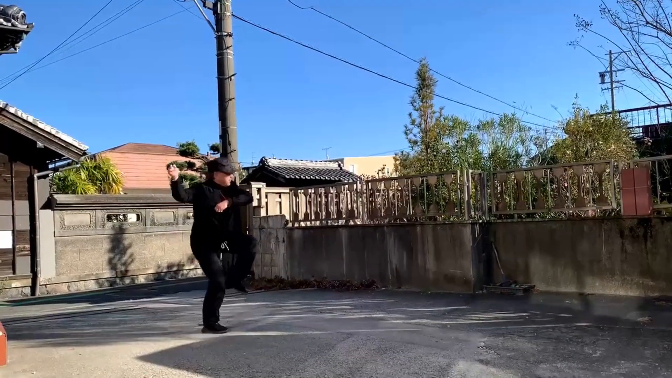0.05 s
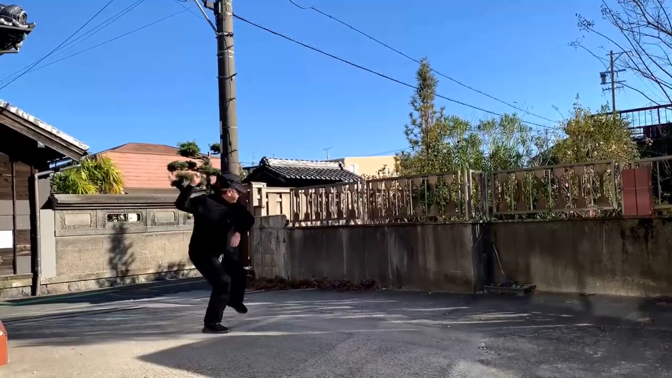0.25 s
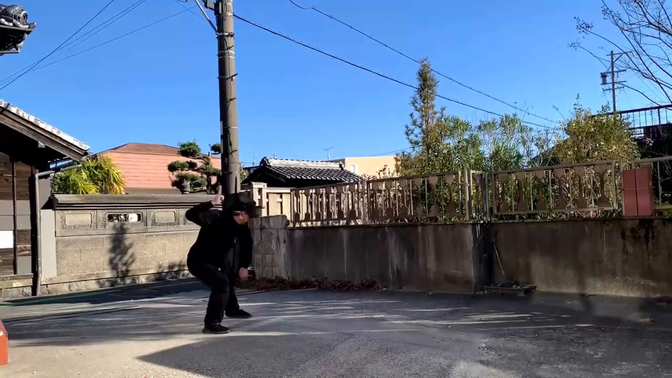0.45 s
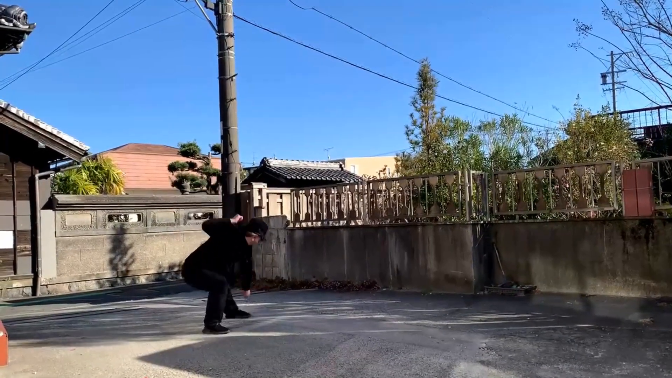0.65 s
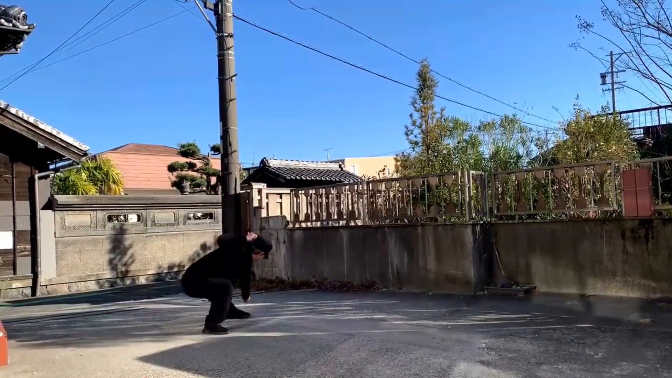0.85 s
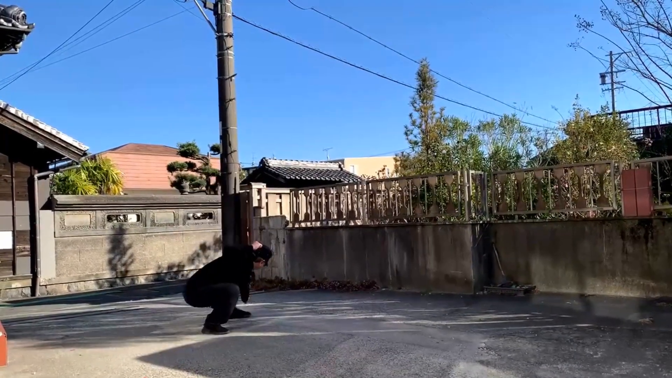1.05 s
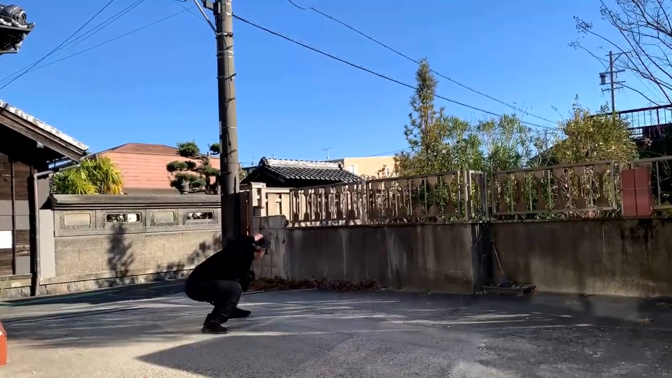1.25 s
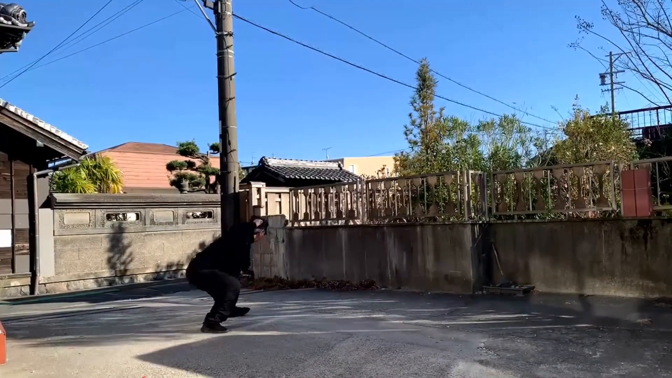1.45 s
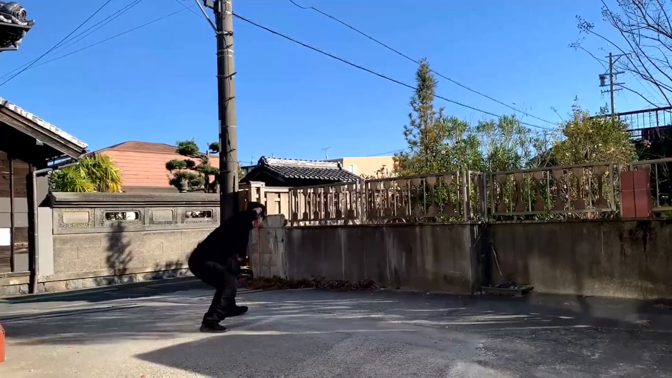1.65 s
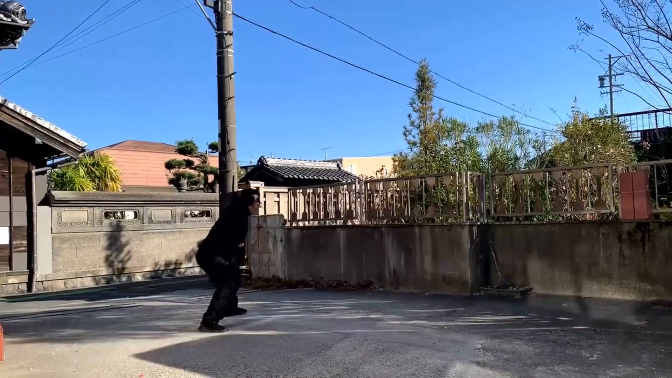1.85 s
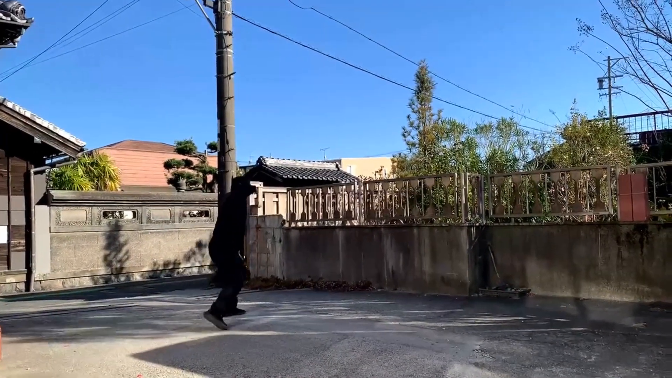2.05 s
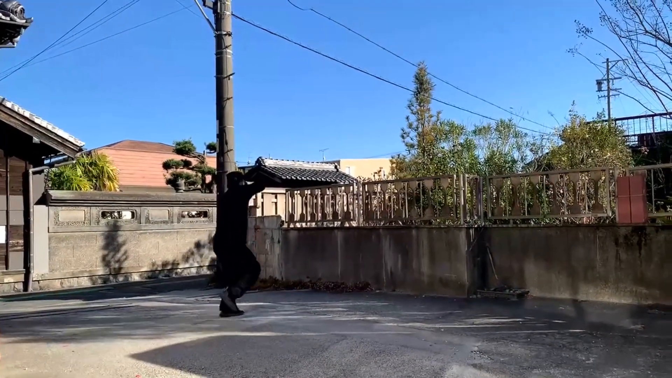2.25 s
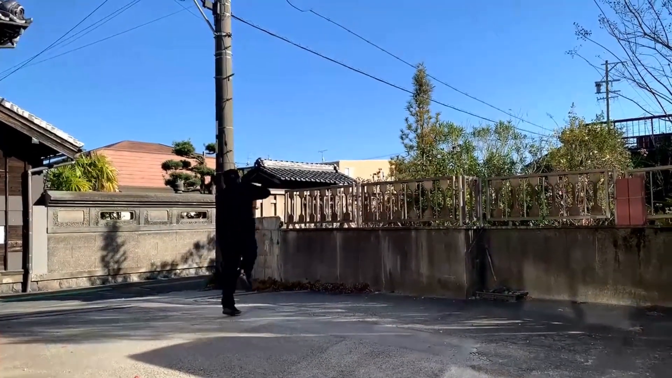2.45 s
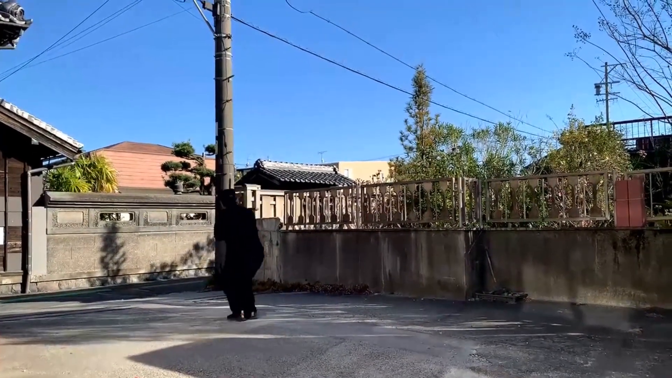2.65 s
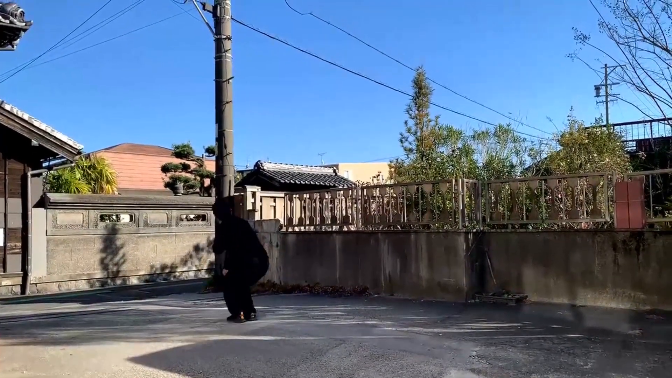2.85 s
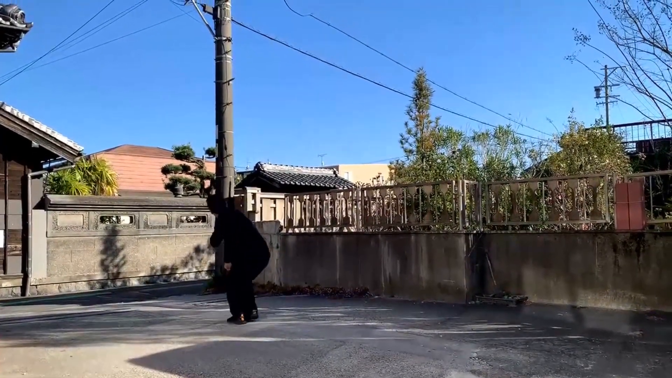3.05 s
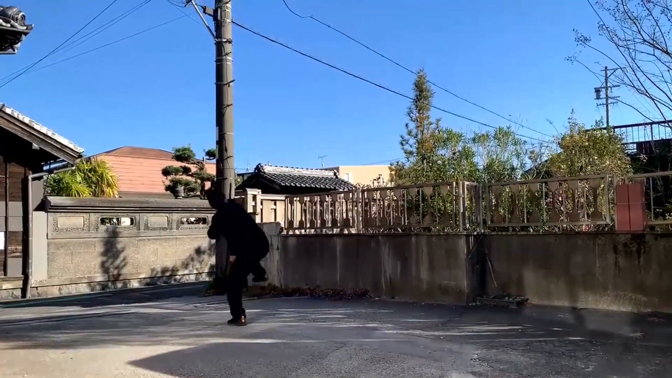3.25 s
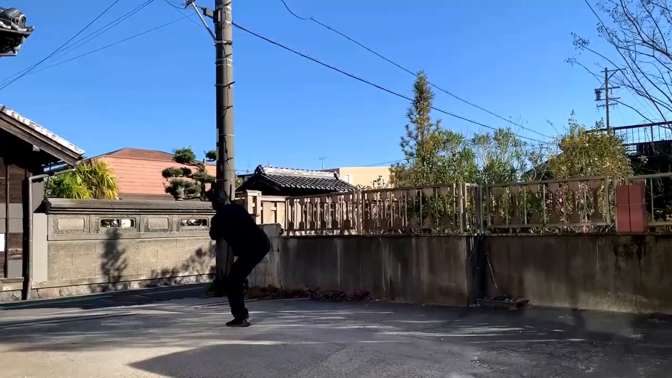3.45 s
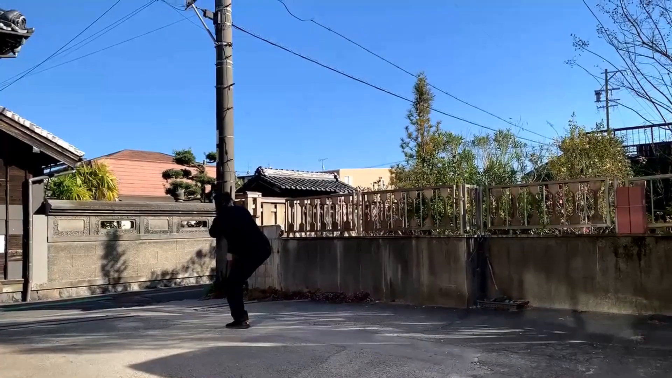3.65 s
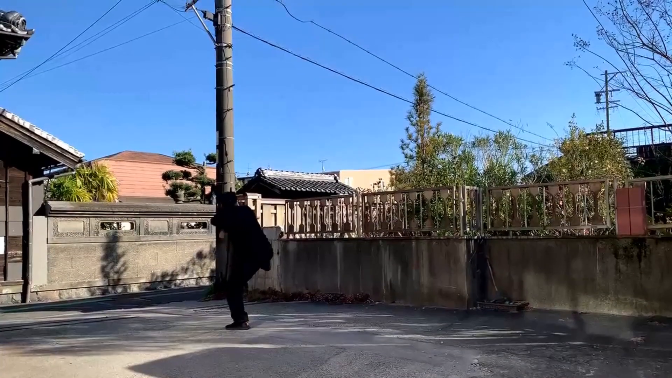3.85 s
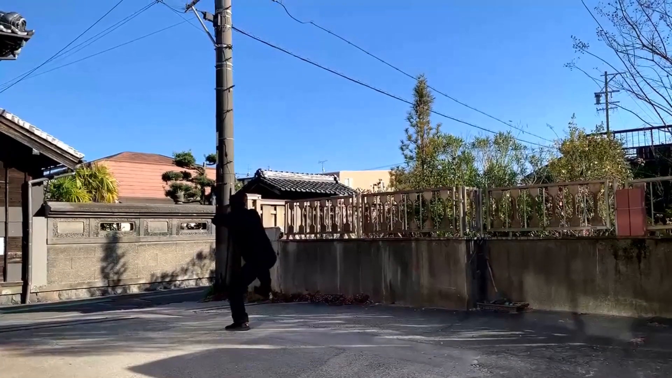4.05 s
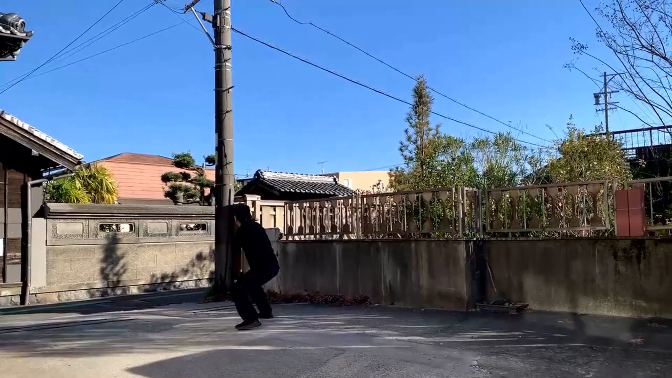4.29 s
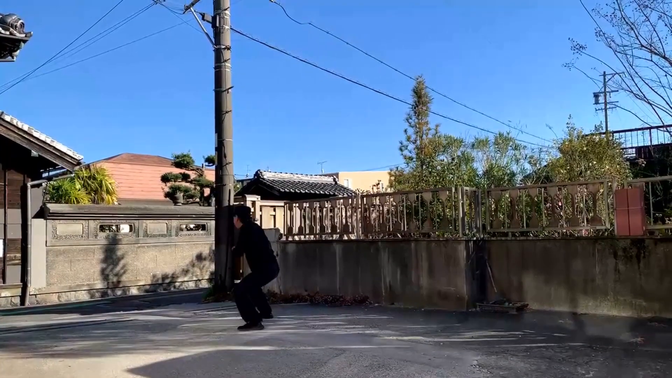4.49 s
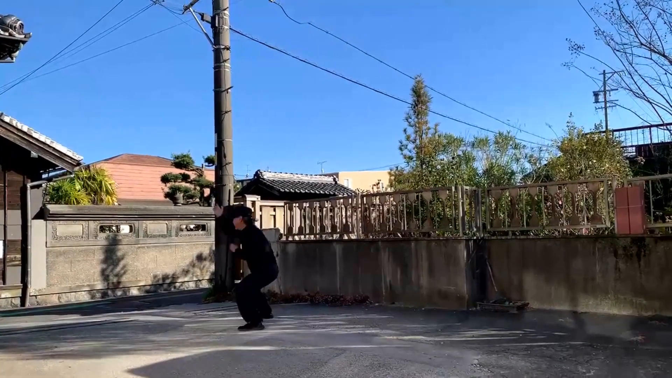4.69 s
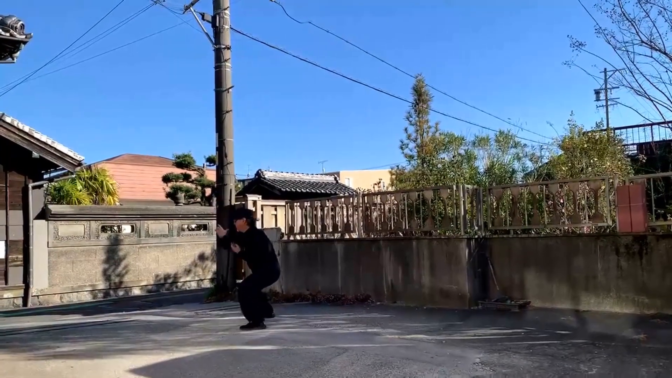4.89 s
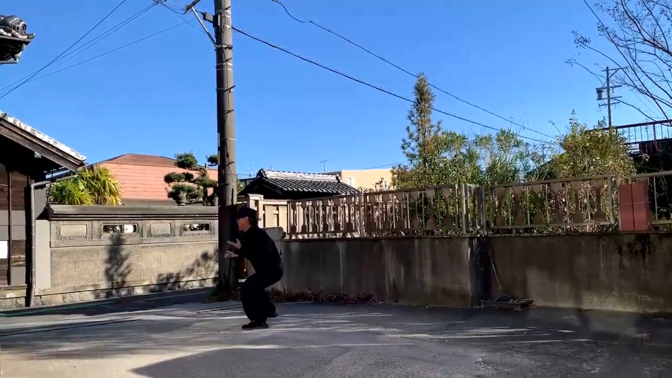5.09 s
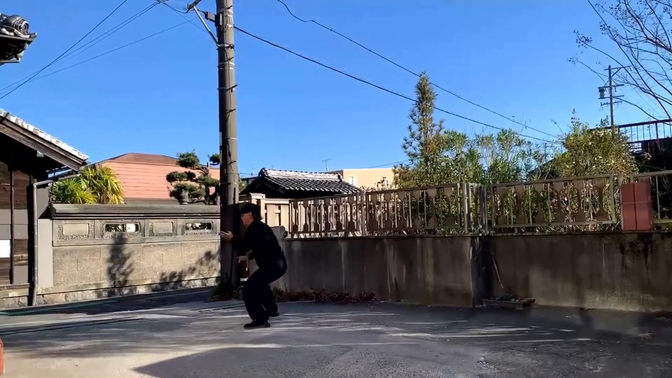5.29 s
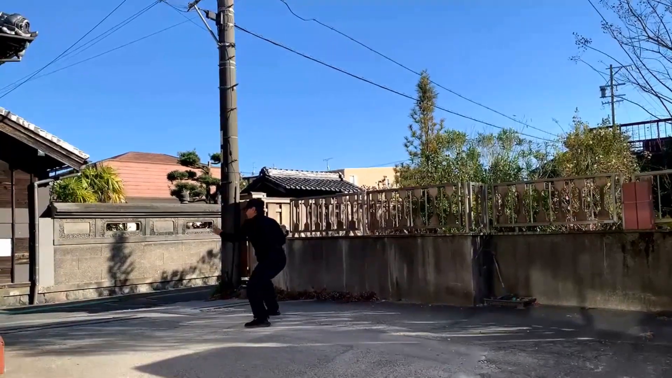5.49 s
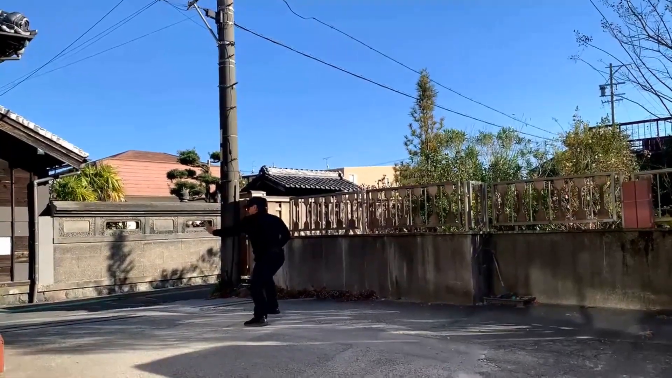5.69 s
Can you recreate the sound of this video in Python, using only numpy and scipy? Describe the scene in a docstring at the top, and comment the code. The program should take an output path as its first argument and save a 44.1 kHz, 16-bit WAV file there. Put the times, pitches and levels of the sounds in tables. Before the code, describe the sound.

Someone practises martial arts outdoors: a light step, scraping soles and ticking grit, then two sharp stamps with short echoes over faint low rumble.

```python
"""A person practises martial arts in a walled asphalt yard, some metres from a phone.
A light step opens, with gusts buffeting the microphone, and an airy hiss lingers after it.
Soles scuff, grit ticks and cloth swishes, all shaped noise; then two hard stamps ring the shoe, thump
the ground and echo off the walls, each with a low tone after it, and scuffs and wind carry on.
Throughout, far off, a town rumbles as slowly swelling noise."""
import sys
import numpy as np
from scipy import signal
from scipy.fft import rfft, irfft
from scipy.io import wavfile
from scipy.ndimage import uniform_filter1d

SR = 44100
rng = np.random.default_rng(int(sys.argv[2]) if len(sys.argv) > 2 else 0)


def digitize_waveform(pressure):
    """Quantize a signal to 16-bit integers and store it at the path in sys.argv[1].

    Rows of a 2-D input are taken as channels; values are limited to [-1, 1].
    """
    field = np.atleast_2d(pressure).T
    bounded = np.clip(field, -1, 1)
    quanta = np.round(bounded * 32767).astype(np.int16)
    wavfile.write(sys.argv[1], SR, quanta)


N = 252693
T = np.arange(N) / SR
HZ = np.maximum(np.arange(N // 2 + 1) * SR / N, 1)


def undb(db):
    """Decibels to gain."""
    return 10 ** (np.asarray(db) / 20)


def unit(x):
    """Scaled to rms 1."""
    return x / np.sqrt(np.mean(x ** 2))


def over_hz(table, axis=1):
    """A table column at every frequency bin, interpolated over log frequency."""
    rows = np.array(table)
    return np.interp(np.log(HZ), np.log(rows[:, 0]), rows[:, axis])


def over_time(table):
    """A (time, level) table at every sample."""
    return np.interp(T, *np.transpose(table))


def band(x, lo_hz, hi_hz, order=2):
    """Causal band-pass."""
    edges = [lo_hz, min(hi_hz, .45 * SR)]
    return signal.sosfilt(signal.butter(order, edges, "band", fs=SR, output="sos"), x)


def walk(rate):
    """Random levels held 1 / rate s and smoothed twice; rms 1."""
    k = int(SR / rate)
    steps = np.repeat(rng.standard_normal(N // k + 1), k)
    return unit(uniform_filter1d(uniform_filter1d(steps, k), k)[:N])


def add(out, s, sound):
    """Mixes a sound in at s seconds."""
    i = int(s * SR)
    out[..., i:i + len(sound)] += sound[:N - i]


def fade(t, t60):
    """Exponential decay, 60 dB down at t60."""
    return np.exp(-np.log(1000) * t / t60)


def rise(t, tau):
    """Exponential onset with time constant tau."""
    return 1 - np.exp(-t / tau)


# contacts of a light step and two stamps, heel then sole:
# start_s, crack_db, grit_db, thud_db, boom_db, push_ms
CONTACTS = [(.031, -33, -55, -49, -48, 0.34), (.048, -45, -50, -56, -55, .2),
            (0.054, -39.5, -62, -54, -63, 0.13), (.059, -44, -59, -56.5, -63, .2),
            (.068, -42.5, -62, -63, -53, 0.3), (.078, -45.5, -58, -61, -65, .2),
            (.087, -51, -50, -59, -60, 0.41), (.102, -57, -56, -71, -60, .3),
            (2.708, -24, -36, -21.5, -49.5, 0.22), (2.713, -38, -57, -21.5, -27.5, 0.98),
            (2.721, -38, -54, -27, -47, .4), (2.727, -29.5, -47, -20, -39.5, 0.56),
            (2.737, -32, -54, -37.5, -47, .3), (2.747, -36.5, -50, -32.5, -36.5, 0.18),
            (2.757, -40, -53, -36.5, -46, .3), (2.775, -43.5, -61, -33.5, -39.5, .9),
            (2.803, -50, -66, -42, -51.5, .5), (4.206, -23.5, -39, -24.5, -36.5, 0.2),
            (4.213, -47.5, -57, -23, -33, 0.76), (4.221, -35.5, -54, -30.5, -38, 0.69),
            (4.231, -31.5, -54, -35, -44, .3), (4.237, -39, -45, -31, -36, .9),
            (4.244, -38, -47, -40, -56, .3), (4.254, -41, -52, -47.5, -51.5, 0.76),
            (4.268, -50, -57, -47, -50.5, .3)]
# modes a shoe on asphalt rings with, before chance: pitch_hz, level_db, t60_s
SHOE_MODES = [(153.8, -10, 0.023), (195, -4, 0.039), (297.4, 1, 0.031), (361.3, 2.5, 0.041),
              (411.4, 1.5, 0.033), (504, -8, 0.071), (611, -2.5, 0.041), (793, -5, 0.033),
              (1008, -0.5, 0.018), (1220, -0.5, 0.013), (1550, -3.5, 0.011), (2058, -1, 0.0078),
              (2620, -17.5, 0.0076)]


def stamps(level_spread_db=4.26, pitch_spread=0.0083):
    """Each contact: a crack and a spray of grit, and a push that rings the shoe."""
    out, cracks, sprays, t = np.zeros(N), np.zeros(N), np.zeros(N), T[:SR // 4]
    burst = rise(t, 0.0011) * (fade(t, 0.02) + 0.16 * fade(t, 0.089))
    spray = rise(t, 0.001) * (fade(t, 0.01) + 0.15 * fade(t, 0.12))
    for s, crack_db, grit_db, thud_db, _, push_ms in CONTACTS:
        add(cracks, s, undb(crack_db) * burst)
        add(sprays, s, undb(grit_db) * spray)
        chance = rng.standard_normal((len(SHOE_MODES), 2))
        ring = 0
        for k, ((hz, db, t60), (a, b)) in enumerate(zip(SHOE_MODES, chance)):
            gain = undb(db + level_spread_db * a)
            tone = np.sin(2 * np.pi * hz * (1 + pitch_spread * b) * t)
            # neighbouring modes swing opposite ways, so the blow starts without a spike
            ring = ring + (-1) ** k * gain * tone * fade(t, t60)
        push = np.hanning(int(push_ms * SR / 1000) + 3)  # a longer push rings fewer high modes
        add(out, s, undb(thud_db) * np.convolve(ring, push / push.sum())[:len(t)])
    noise = rng.standard_normal(N) * undb(4.06 * walk(220))  # rough, lumpy contact
    crack = 2.07 * band(noise, 540, 2990) + 3.5 * band(noise, 620, 1150)
    crack += 0.74 * band(noise, 1900, 2600)
    grit = 2.9 * band(noise, 2600, 3195) + 2.0 * band(noise, 2900, 5350)
    grit += 1.5 * band(noise, 3400, 9000, order=1) + 0.55 * band(noise, 9500, 11000)
    return out + cracks * crack + sprays * grit


def booms():
    """Each contact also shakes the ground; two low decaying tones make a short boom."""
    out, t = np.zeros(N), T[:SR // 4]
    boom = 2.0 * np.sin(2 * np.pi * 95 * t) * fade(t, 0.17)
    boom += 1.9 * np.sin(2 * np.pi * 58 * t) * fade(t, 0.059)
    for s, _, _, _, boom_db, _ in CONTACTS:
        add(out, s, undb(boom_db) * boom)
    return out


# low tones that swell and fade after each stamp, perhaps a fence panel:
# start_s, pitch_hz, level_db, rise_s, t60_s
HUM_TONES = [(2.795, 283.6, -29, 0.027, 0.11), (4.284, 286, -26, 0.018, 0.13),
             (4.343, 275, -38.5, .009, 0.094)]


def hums():
    """A nearly pure tone with a faint octave, swelling and dying along bell curves."""
    out, t = np.zeros(N), T[:SR // 2]
    for s, hz, db, rise_s, t60 in HUM_TONES:
        turn = 2 * np.pi * hz * t
        swell = (1 - np.exp(-(t / rise_s) ** 2)) * fade(t ** 2 / t60, t60)
        add(out, s, undb(db) * swell * (np.sin(turn) + 0.15 * np.sin(2 * turn)))
    return out


# separate scuffs of a sole or swishes of cloth; attack and release climb or drop 20 dB, the last three
# columns are relative to level_db: start_s (of the hold), level_db, attack_s, hold_s, release_s,
# lows_db, bite_db, highs_db
SCUFF_EVENTS = [(0.026, -63.5, 0.0071, 0.039, 0.048, 13.5, 3, 11),
                (0.161, -54.5, 0.043, .004, 0.044, -13, -34, -29),
                (0.216, -81, .05, .3, 0.23, -14, -24, -28), (0.585, -71.5, 0.12, .01, 0.68, 2, -7.5, -2.5),
                (0.734, -71, 0.027, .004, 0.045, 8.5, 2.5, -3), (0.829, -66, 0.043, .004, 0.11, 2, -6, -4),
                (0.898, -56.5, 0.042, 0.0045, 0.036, 0, -2.5, -6.5),
                (0.984, -60.5, 0.048, 0.11, 0.13, 1, -8, -2),
                (1.367, -68.5, 0.099, 0.027, 0.31, 2.5, -5, -3),
                (1.566, -63, 0.072, 0.067, 0.059, 0.5, -6.5, -8),
                (1.612, -59.5, 0.033, 0.026, 0.073, -16, -2, -3.5),
                (1.792, -72.5, 0.29, .004, 0.1, -1.5, -5.5, -3),
                (2.08, -81, 0.03, 0.0036, 0.068, 18, -7, 2),
                (2.137, -67, 0.021, 0.036, 0.019, 7, -5.5, 5.5),
                (2.358, -81.5, 0.051, 0.032, 0.036, -9, -4, 0),
                (2.541, -53, 0.021, 0.0048, 0.016, -5, 4.5, -5),
                (2.65, -65.5, 0.037, 0.072, 0.1, -0.5, -11.5, -8),
                (3.174, -56, 0.034, 0.013, 0.033, -0.5, -2.5, -2),
                (3.41, -53.5, 0.03, 0.051, 0.042, 0.5, -5, -2),
                (3.858, -76.5, 0.068, 0.0038, 0.042, -8, -16.5, -29),
                (3.99, -91.5, 0.015, 0.003, 0.014, 20.5, -19.5, -18),
                (4.2, -58.5, 0.026, 0.048, 0.19, 8.5, -13, -9.5),
                (4.402, -53.5, 0.0063, 0.0035, 0.059, 0.5, -6.5, -9),
                (4.536, -74, 0.043, 0.0027, 0.055, 0, -1, -10),
                (4.606, -68, 0.025, 0.018, 0.059, -3.5, -5, -7),
                (4.989, -67, 0.041, 0.0035, 0.038, -0.5, -7, -18),
                (5.237, -65.5, 0.047, 0.0052, 0.039, -3.5, -36, -31),
                (5.309, -77, 0.039, 0.0044, 0.027, 2, 0.5, -2),
                (5.589, -61, 0.11, .004, 0.13, 0, -9.5, -5.5),
                (5.687, -63, 0.062, 0.035, .05, -14, -18, -12)]
# faint rustle of clothing between the scuffs: time_s, level_db
CLOTH_RUSTLE = [(0, -76), (.6, -95), (1.2, -90), (1.75, -90), (1.95, -86), (2.25, -84), (2.48, -100),
                (3.12, -81), (3.3, -96), (3.7, -103), (4.1, -102), (4.5, -84), (4.8, -100), (5.15, -100),
                (5.45, -84.5), (5.73, -84)]
RUSTLE_LOWS_DB, RUSTLE_BITE_DB, RUSTLE_HIGHS_DB = 2.5, -13.5, -7  # relative to the rustle level


def scuffs(grain_db=4.0, patchy_db=2.0, crunch_db=4.0):
    """Dense grit of uneven sizes; the sole rings the lows in crunchy lumps. Returns shared, left, right."""
    colours_db = np.array([[0], [RUSTLE_LOWS_DB], [RUSTLE_BITE_DB], [RUSTLE_HIGHS_DB]])
    power = undb(over_time(CLOTH_RUSTLE) + colours_db) ** 2
    for s, db, attack, hold, release, *colour_db in SCUFF_EVENTS:
        on = slice(max(int((s - 3 * attack) * SR), 0), int((s + hold + 3 * release) * SR))
        before, after = (s - T[on]) / attack, (T[on] - s - hold) / release
        drop = 20 * np.maximum(np.maximum(before, after), 0)
        power[:, on] += undb(db - drop + np.array([0, *colour_db])[:, None]) ** 2
    level, lows, bite, highs = np.sqrt(power)
    grains = np.minimum(rng.exponential(size=N), 6)
    grit = rng.standard_normal((3, N)) * undb(grain_db * grains + patchy_db * walk(150))
    crunch = grit * undb(crunch_db * walk(90))
    sole = unit(band(crunch, 1065, 1700) + 2.0 * band(crunch, 600, 1336))
    body = unit(band(grit, 1900, 4200) + 0.63 * band(grit, 1700, 2584))
    bright = bite * unit(band(grit, 6080, 6930)) + highs * unit(band(grit, 7960, 13000))
    return level * body + lows * sole + bright


# single grains of grit cracking under a sole: start_s, level_db, pitch_hz, highs_db (relative)
GRIT_TICKS = [(0.591, -50, 1260, -28), (0.643, -52, 1030, 0), (0.163, -52, 3600, -25),
              (0.7365, -51, 2180, 7), (0.826, -50, 1500, 4), (0.8703, -55.5, 2070, 5),
              (0.893, -50, 2200, 10), (0.9003, -43.5, 1210, -34), (0.9624, -47.5, 2700, -9),
              (1.007, -46, 1420, -14), (1.0294, -35, 1200, 1.5), (1.067, -42, 1390, -11),
              (1.087, -42.5, 1330, -23), (1.1077, -35, 1250, -14), (1.1554, -53, 3400, 4.5),
              (1.166, -43, 1460, -6.5), (1.337, -63.5, 4350, 9), (1.372, -56.5, 3460, 11),
              (1.5263, -47, 1380, -25), (1.552, -57, 1990, -25), (1.6, -37.5, 1270, -19),
              (1.6141, -38, 1360, -8), (1.743, -61, 937, 8), (2.077, -48, 1230, -18),
              (2.127, -54, 1620, -0.5), (2.5346, -27, 4880, -39), (2.536, -43.5, 1300, -20.5),
              (2.7081, -42, 4200, 11.5), (3.1686, -37.5, 2060, -1), (3.1762, -40.5, 1190, 8),
              (3.461, -36, 2005, -4), (3.846, -62, 3400, -20), (3.987, -65, 2100, -30),
              (4.4047, -39, 4020, -3), (4.536, -48.5, 5960, -30), (4.5436, -59, 897, -23),
              (4.603, -56, 2510, -24), (4.6106, -56, 3680, -14), (4.9804, -55.5, 1333, -33),
              (5.222, -65, 2680, -40), (5.72, -58.5, 2200, 6.5)]


def ticks():
    """A click and a short ring at the grain's pitch, and a bright pip."""
    out, t = np.zeros(N), T[:SR // 50]
    for s, db, hz, highs_db in GRIT_TICKS:
        snap = rng.standard_normal(len(t)) * rise(t, 0.00084) * fade(t, 0.0054)
        ring = np.sin(2 * np.pi * hz * t) * fade(t, 0.016)
        click = 3.6 * band(snap, hz / 1.6, hz * 1.53)
        pip = 3.8 * band(snap, 2700, 6500) + 5 * band(snap, 8000, 12000)
        add(out, s, undb(db) * (click + 0.4 * ring + undb(highs_db) * pip))
    return out


AIRY_S, AIRY_DB, AIRY_T60_S, AIRY_LO_HZ, AIRY_HI_HZ = 0.12, -71, 1.46, 1820, 2590


def airy():
    """A narrow, wavering hiss after the first step that fades in quickly and dies slowly."""
    t = np.maximum(T - AIRY_S, 0)
    swell = rise(t, 0.044) * fade(t ** 2 / AIRY_T60_S, AIRY_T60_S)
    hiss = unit(band(rng.standard_normal(N), AIRY_LO_HZ, AIRY_HI_HZ, order=3))
    return undb(AIRY_DB + 3.9 * walk(9.5)) * swell * hiss


# reverberation of the walled yard, weighted later by 1 / sqrt(pitch): pitch_hz, level_db, t60_s
YARD_BANDS = [(113.2, -24.5, 0.45), (233, -35.5, 0.75), (477, -27, 0.44), (1054, -20, 0.45),
              (2100, -16, 0.5), (3110, -11.5, 0.37), (4640, -7, 0.18), (7600, 0.5, 0.14)]


def yard(x, lumpy_db=3.0, sparse_db=3.5):
    """Echoes off the walls: lumpy noise that builds within milliseconds and dies band by band."""
    t = T[:SR]
    start = (1 - np.exp(-(t / 0.0035) ** 2)) * undb(lumpy_db * walk(120)[:SR])
    # some echoes stand out
    start = start * unit(undb(sparse_db * np.minimum(rng.exponential(size=SR), 5)))
    tail = 0
    for hz, db, t60 in YARD_BANDS:
        noise = unit(band(rng.standard_normal(SR), hz / 1.307, hz * 1.336))
        tail = tail + undb(db) * fade(t, t60) * noise / np.sqrt(hz)
    return signal.fftconvolve(x, start * tail)[:N]


# strength of the wind on the microphone ports, before flutter: time_s, level_db
WIND_STRENGTH = [(0, -54), (.3, -58.5), (.53, -55), (1.0, -61), (1.3, -73.5), (1.6, -65), (1.85, -80),
                 (2.15, -59.5), (2.4, -68.5), (2.5, -56), (2.95, -49.5), (3.2, -70.5), (3.55, -76),
                 (3.8, -71.5), (4.2, -62.5), (4.62, -72), (5.05, -55), (5.36, -54), (5.73, -63)]
FLUTTER_DB, FLUTTER_PER_S = 4, 22
# the hardest puffs, a bell-shaped swell each: peak_s, level_db, half_length_s, pitch_hz
WIND_PUFFS = [(.016, -39.5, .02, 92), (0.044, -35, 0.03, 63.6), (0.059, -36.5, .03, 58),
              (0.112, -48, 0.04, 55), (0.212, -36, 0.03, 74), (0.221, -34.5, .014, 127),
              (.232, -34, .025, 62), (0.311, -39, 0.024, 74), (.352, -44, 0.025, 65),
              (.415, -48.5, 0.059, 61.6), (0.562, -35.5, 0.021, 102), (0.594, -44, .03, 65),
              (0.654, -48, 0.032, 70), (2.45, -45, .02, 74.5), (2.461, -43, .01, 203),
              (2.472, -45, .018, 119), (2.496, -41, .025, 70), (2.553, -38.5, 0.023, 88),
              (2.631, -44.5, 0.03, 75), (2.678, -48.5, 0.035, 69), (2.845, -42.5, .06, 55),
              (3.69, -59.5, 0.071, 60.4), (4.722, -58, 0.036, 60), (4.807, -61, 0.027, 71),
              (4.876, -45.5, 0.027, 77), (4.955, -46, 0.03, 62), (5.039, -50.5, 0.056, 52),
              (5.085, -47, .03, 110), (5.144, -41.5, 0.035, 85), (5.2, -46, .04, 50),
              (5.242, -39, 0.048, 76), (5.362, -45.5, .06, 52)]


def gust_noise():
    """Low turbulence noise, rms 1."""
    low = band(rng.standard_normal(N), 27, 98)
    return unit(low + 0.32 * band(rng.standard_normal(N), 32, 140))


def gusts():
    """Turbulence thumps the ports, nearly alike in both channels; each hard puff is a short swing of air."""
    level = undb(over_time(WIND_STRENGTH) + FLUTTER_DB * walk(FLUTTER_PER_S))
    mid, side = gust_noise(), gust_noise()
    # evened out, so the gust sets the strength, not chance
    mid = unit(mid / (0.18 + uniform_filter1d(np.abs(mid), SR // 40)))
    out = band(level * (mid + 0.428 * side * np.array([[1], [-1]])), 21, 111.6)
    for (s, db, length, hz), (turn, lean) in zip(WIND_PUFFS, rng.random((len(WIND_PUFFS), 2))):
        t = np.arange(-length, length, 1 / SR)
        swell = undb(db) * np.exp(-2 * (2 * t / length) ** 2)
        for port, sign in zip(out, (1, -1)):
            swing = np.cos(2 * np.pi * (hz * t + turn) + sign * 0.6 * lean)
            add(port, max(s - length, 0), swell * swing)
    return out


# spectrum of the far town, relative: pitch_hz, level_db (per Hz)
TOWN_SPECTRUM = [(41, -34), (70, -14), (103, 2.5), (137, -21.5), (201, -9.5), (315, -19), (472, -19.5),
                 (640, -27.5), (906, -35), (1110, -35), (1240, -41), (1700, -42.5), (2330, -47.5),
                 (2900, -55), (7000, -59.5), (12000, -63), (15000, -75.5)]
TOWN_DB = -53.5  # rms


def town():
    """Distant traffic: noise bands half an octave apart that swell together and flicker alone."""
    noise = irfft(rfft(rng.standard_normal(N)) * undb(over_hz(TOWN_SPECTRUM)), N)
    out, swell = 0, walk(1.0)
    for hz in 60 * 2 ** np.arange(0, 8.1, .5):
        flicker = np.clip(1.2 * walk(2.69) + 1.8 * walk(14), -6, 3.5)
        out = out + undb(1.0 * swell + flicker) * band(noise, hz / 1.135, hz * 1.182)
    return undb(TOWN_DB) * unit(out)


# the phone's stereo: pitch_hz, right_lag_rad, unshared (power share of each channel's own sound, 0-1)
PHONE_STEREO = [(39.36, 1.4, 0.3), (91, 2.19, 0.04), (129.8, 3.25, 0.12), (387, 6.04, 0.44),
                (572, 9.44, 0.36), (815, 11.84, 0), (1022, 14.78, 0.4), (1400, 19.05, 0.5),
                (1595, 16.5, .4), (2320, 18.9, 0.6), (2650, 21.24, 0.6), (4490, 20.2, 0.2),
                (5230, 22.2, 0.76), (8960, 22, 0.4), (10700, 17.9, 0), (13520, 18, 0.9), (16040, 13, 0.3)]


def stereo(shared, left, right):
    """Each channel hears shared and own sound; the right one is turned in phase."""
    own = np.clip(over_hz(PHONE_STEREO, axis=2), 0, 1)
    both = np.sqrt(1 - own) * rfft(shared)
    turn = np.exp(-1j * np.interp(HZ, *np.array(PHONE_STEREO)[:, :2].T))
    left_bins = both + np.sqrt(own) * rfft(left)
    right_bins = turn * (both + np.sqrt(own) * rfft(right))
    return irfft(np.array([left_bins, right_bins]), N)


def scene():
    """Direct sound, its echoes, the town and the wind."""
    heard, tone = [], hums() + booms()
    for rub in scuffs():  # the shared sound and each channel's own differ in their fine chance
        blows, rubs = stamps(), rub + ticks()
        echoes = yard(blows + undb(-2.0) * rubs)
        heard.append(blows + rubs + tone + echoes + town() + airy())
    return stereo(*heard) + gusts()


# microphone colour: pitch_hz, level_db
MIC_COLOUR = [(22, -17.5), (45, -0.5), (100, -4), (7500, 0), (8600, -0.5), (10000, -3), (12000, -6),
              (13500, -16), (14800, 3.5), (15600, -25.5)]
TOP_HZ = 15800


def record(dry):
    """Microphone colour, then a steep low-pass at the top."""
    coloured = irfft(rfft(dry) * undb(over_hz(MIC_COLOUR)), N)
    return signal.sosfilt(signal.ellip(8, .2, 70, TOP_HZ, fs=SR, output="sos"), coloured)


dry = scene()
out = record(dry)
digitize_waveform(out)
```